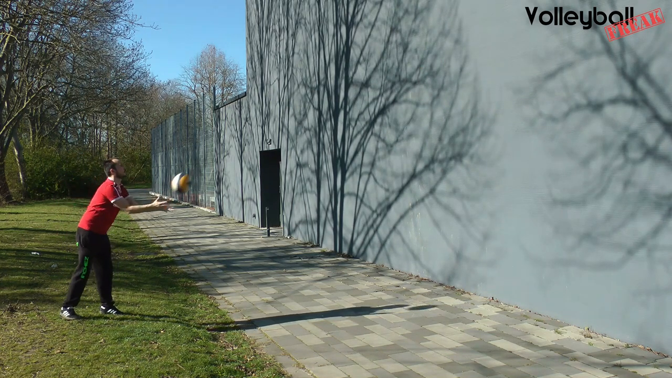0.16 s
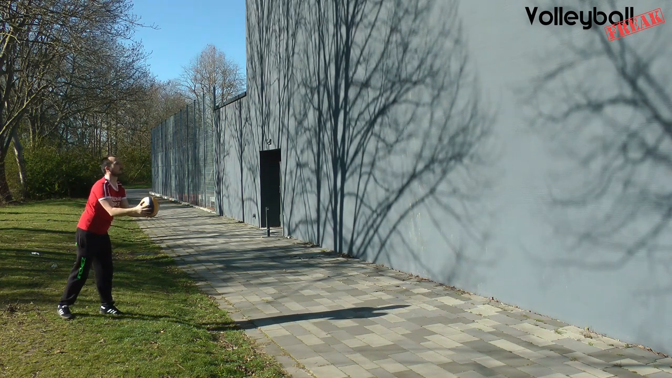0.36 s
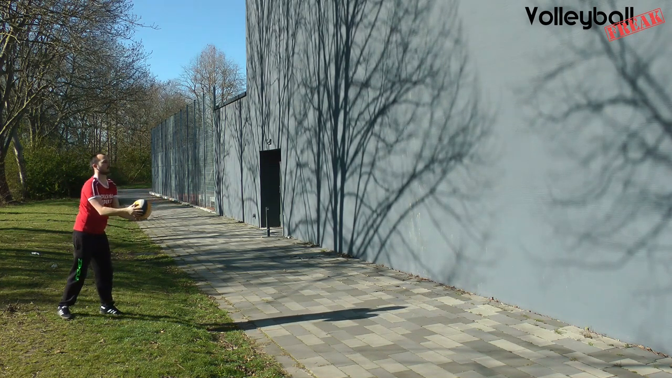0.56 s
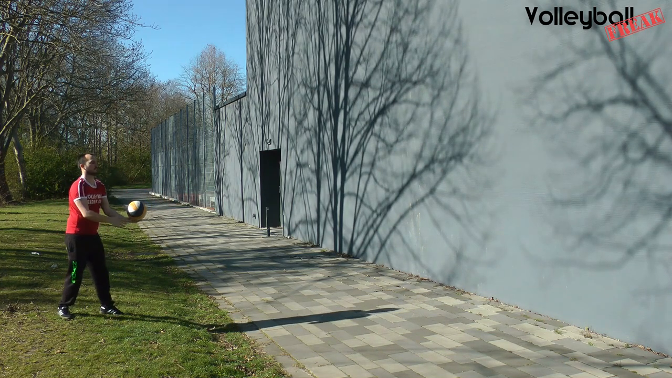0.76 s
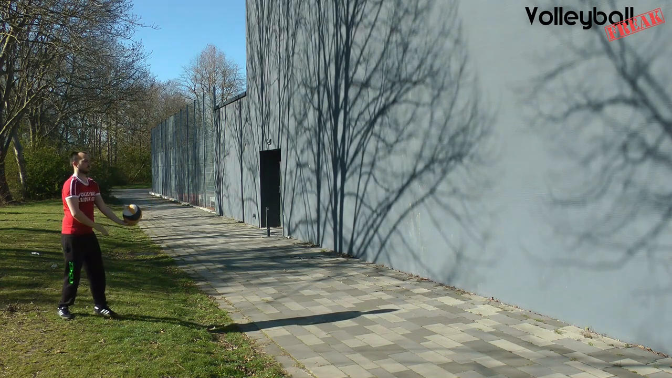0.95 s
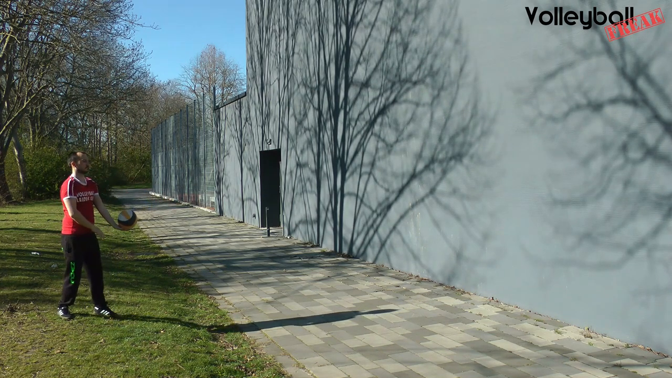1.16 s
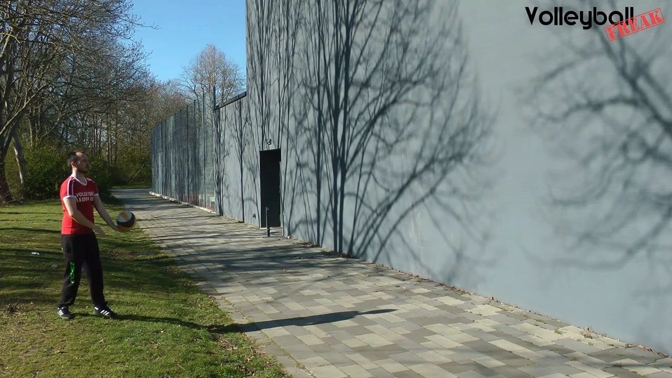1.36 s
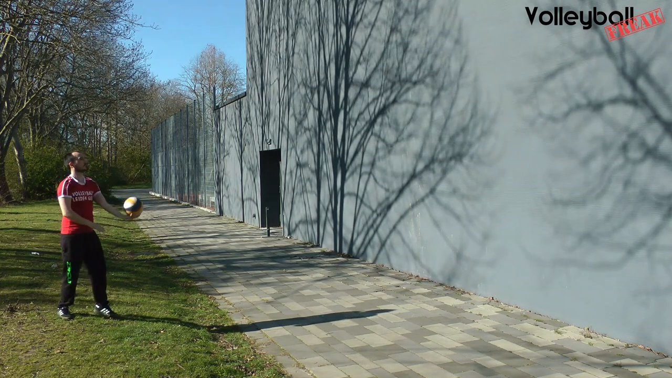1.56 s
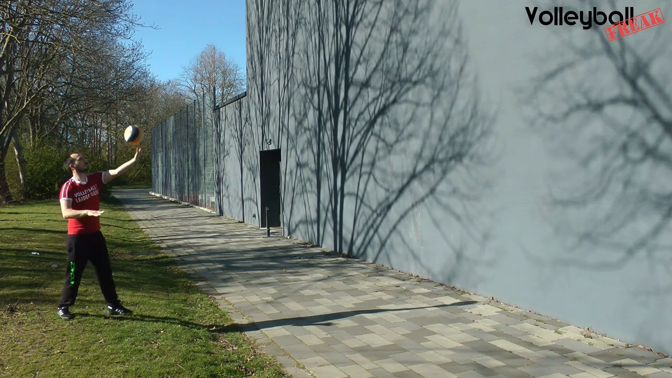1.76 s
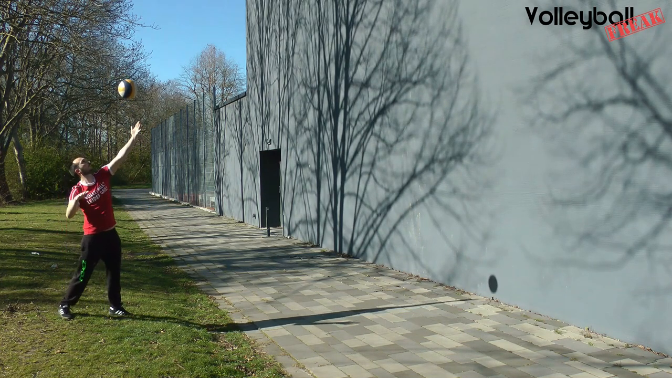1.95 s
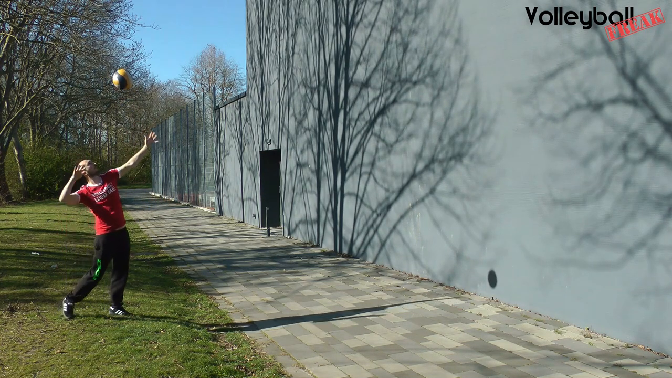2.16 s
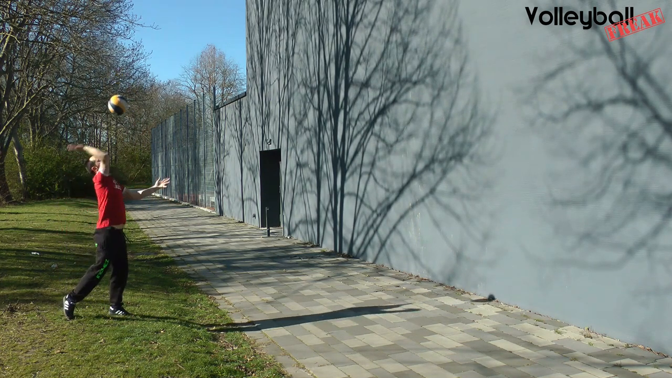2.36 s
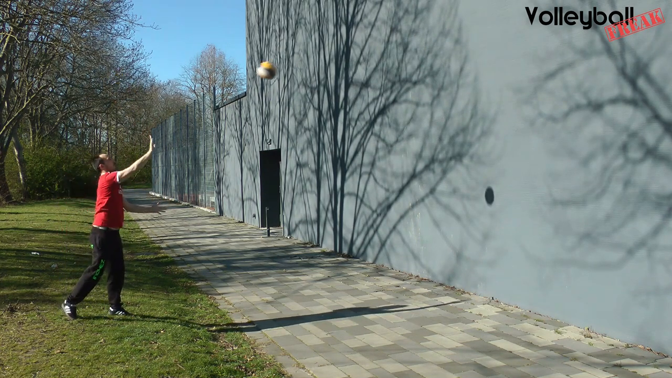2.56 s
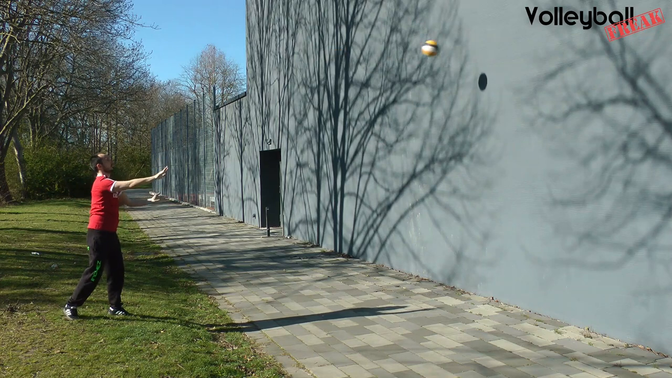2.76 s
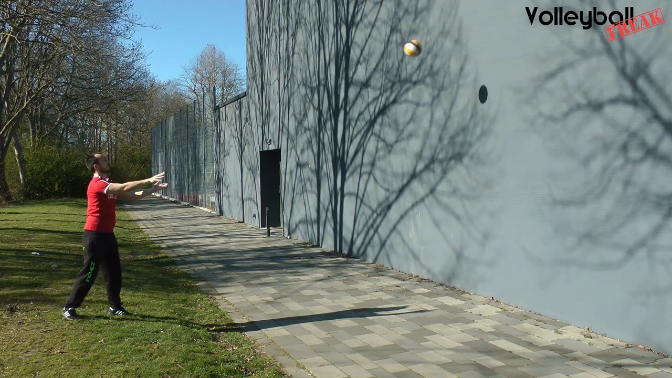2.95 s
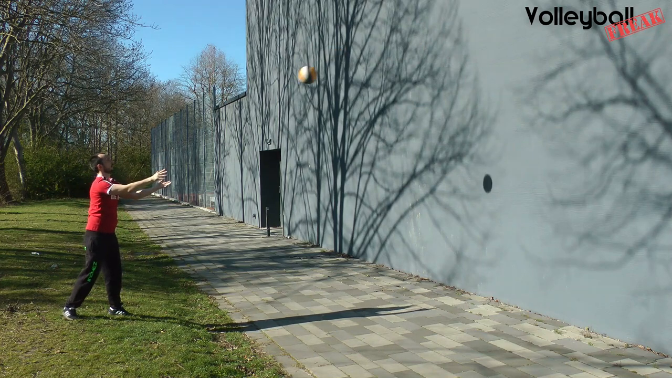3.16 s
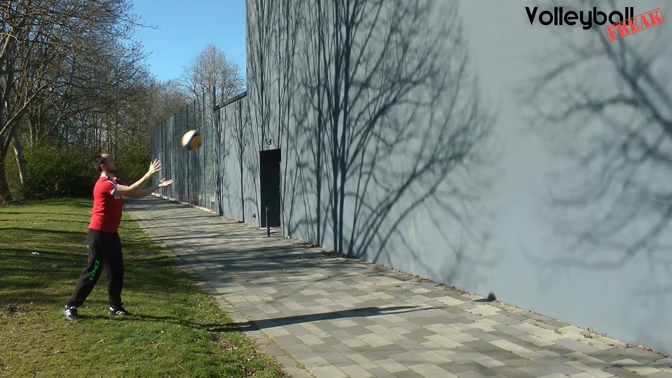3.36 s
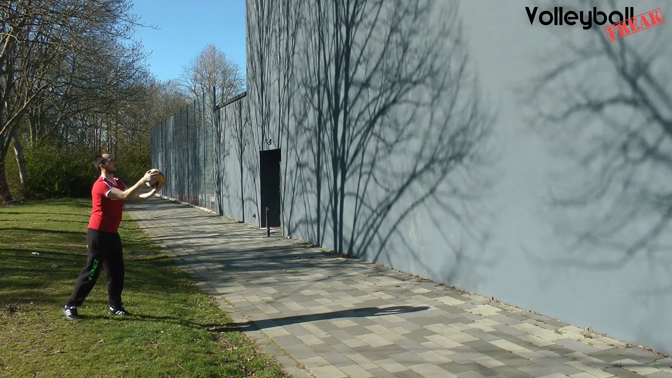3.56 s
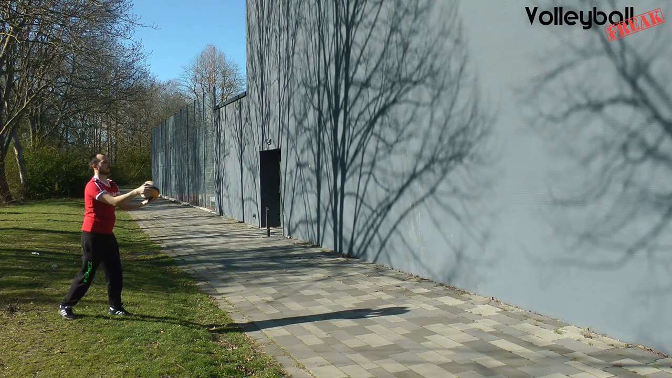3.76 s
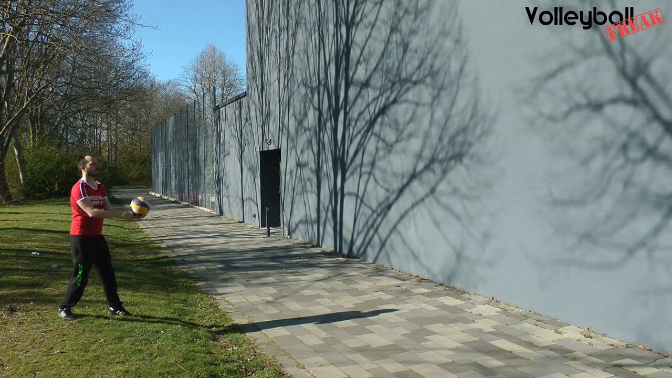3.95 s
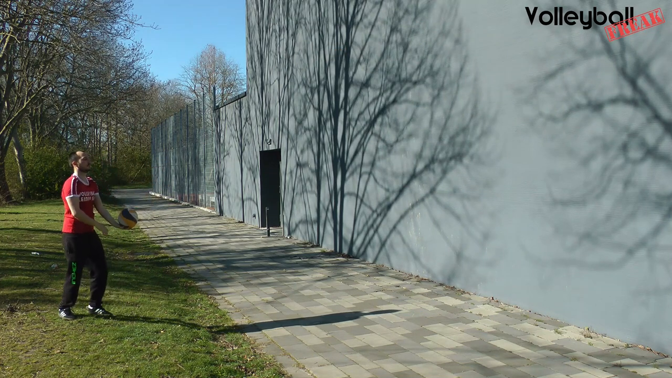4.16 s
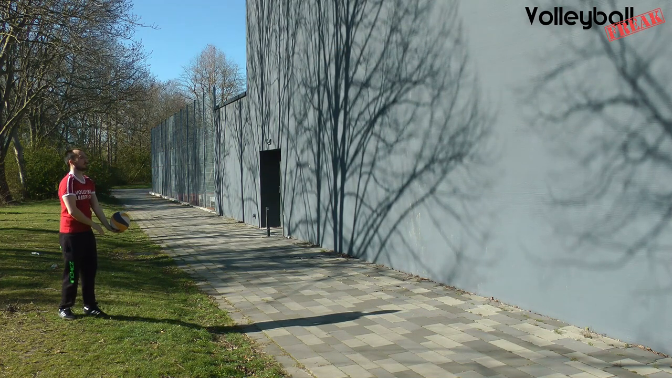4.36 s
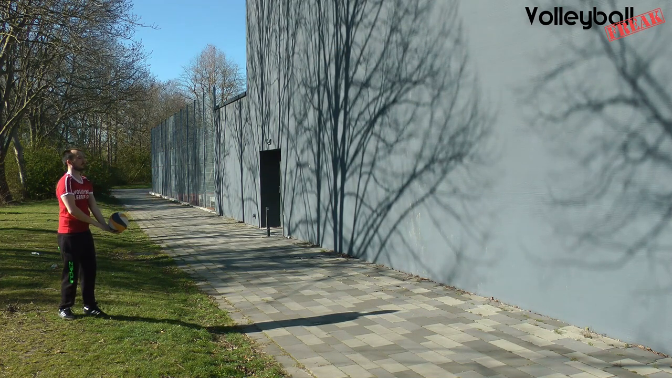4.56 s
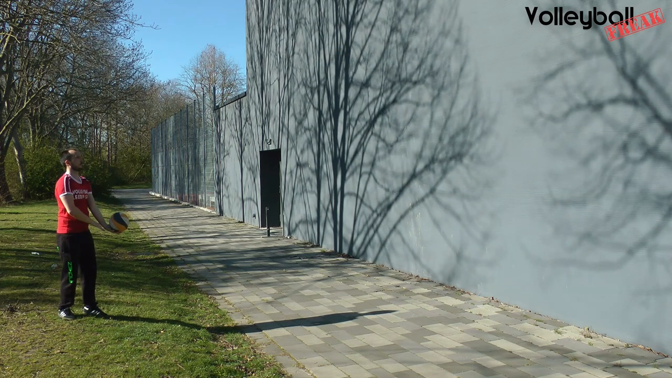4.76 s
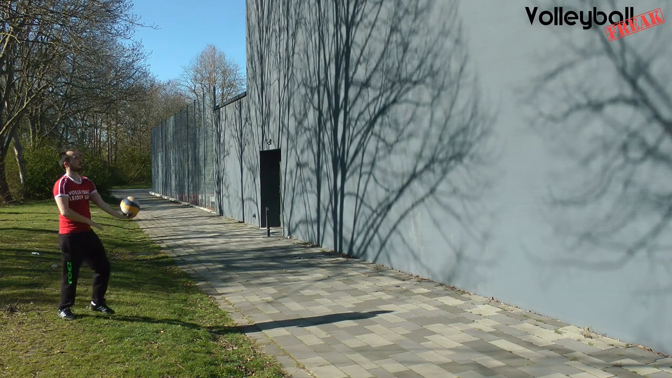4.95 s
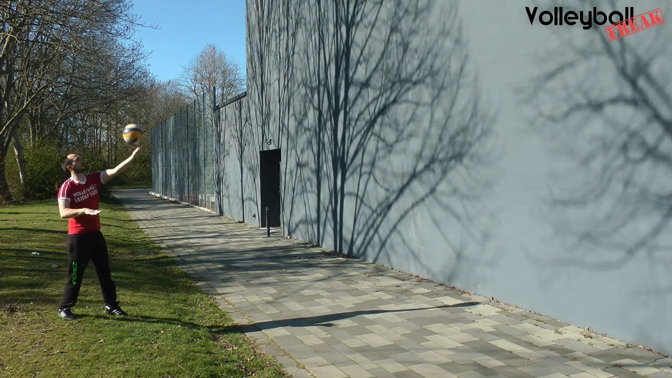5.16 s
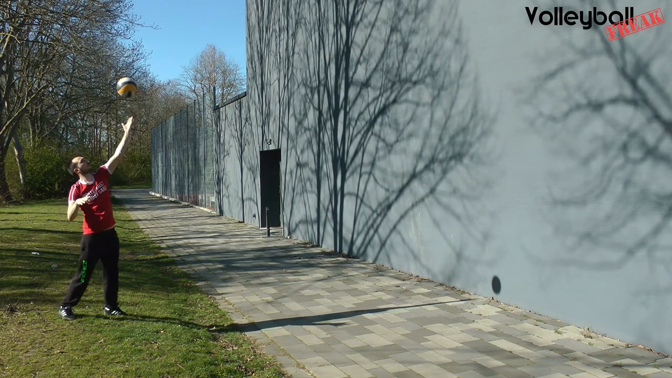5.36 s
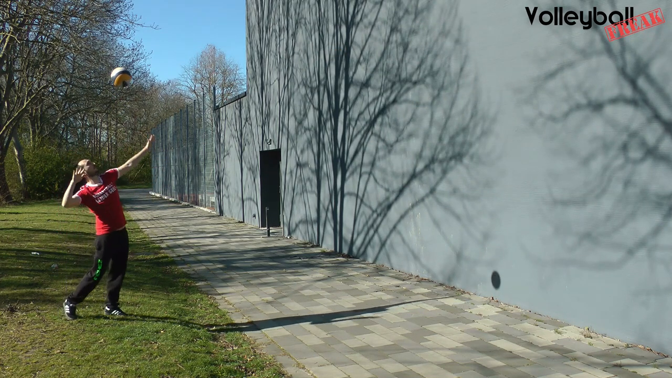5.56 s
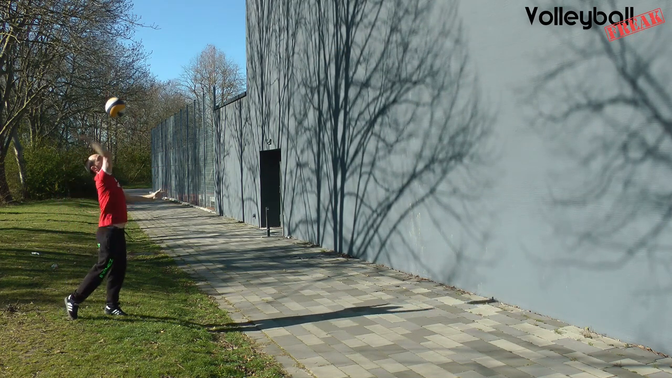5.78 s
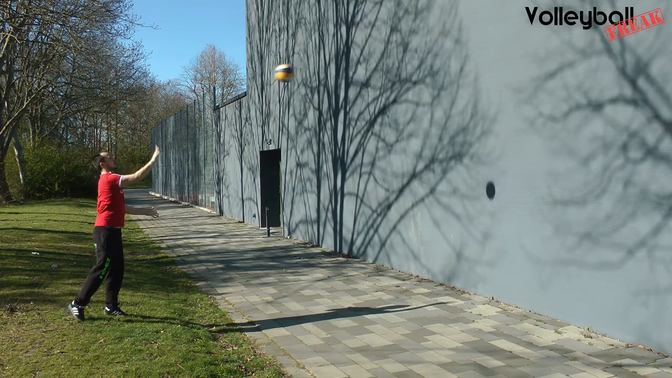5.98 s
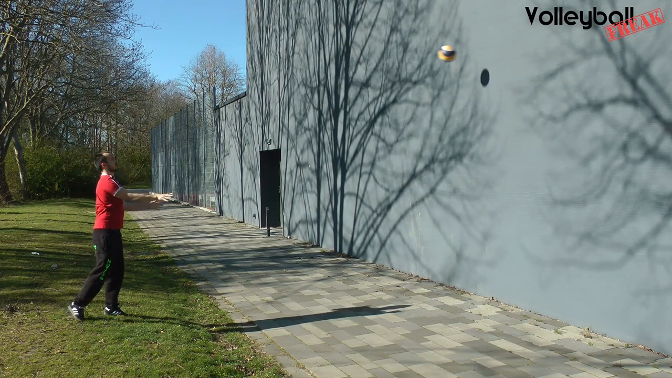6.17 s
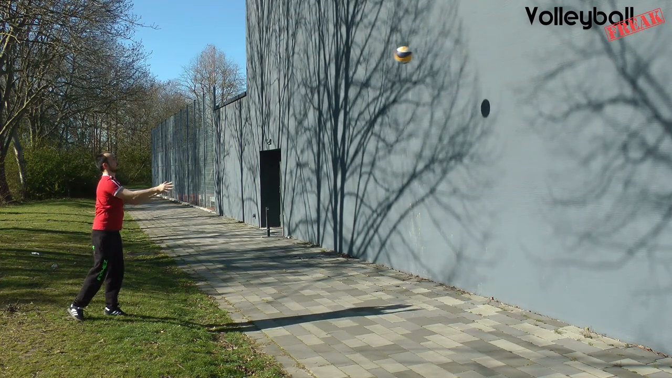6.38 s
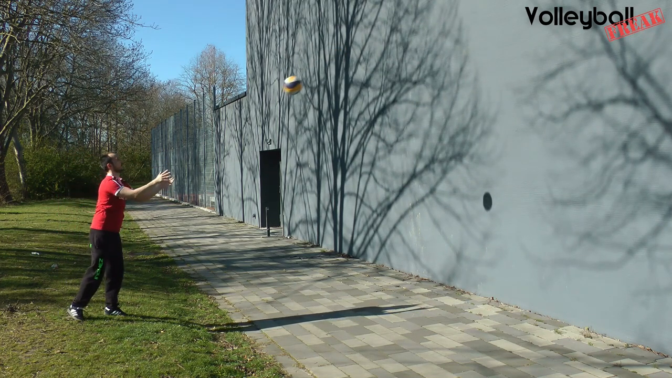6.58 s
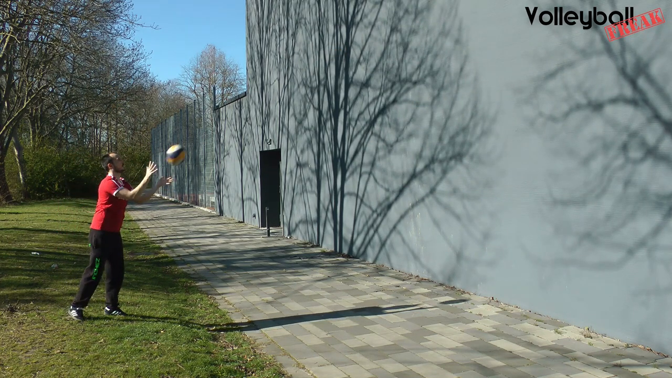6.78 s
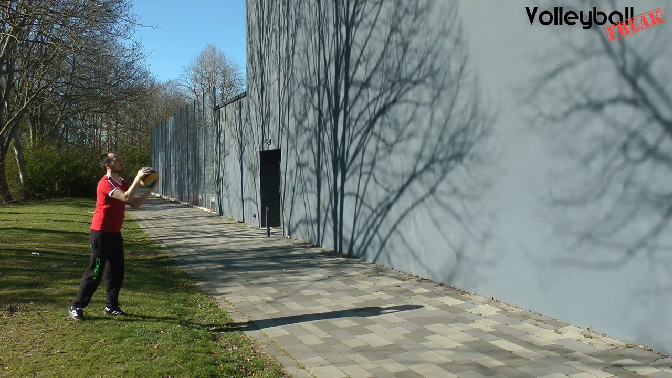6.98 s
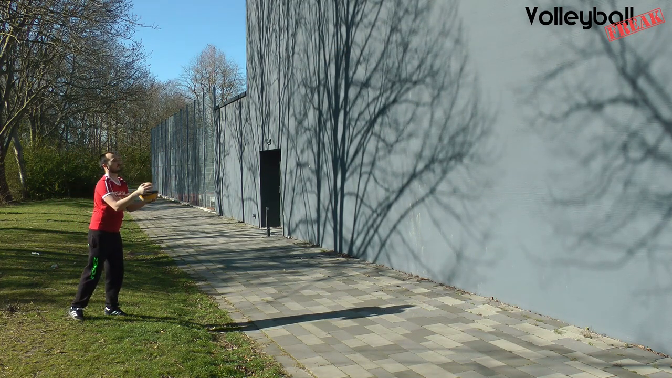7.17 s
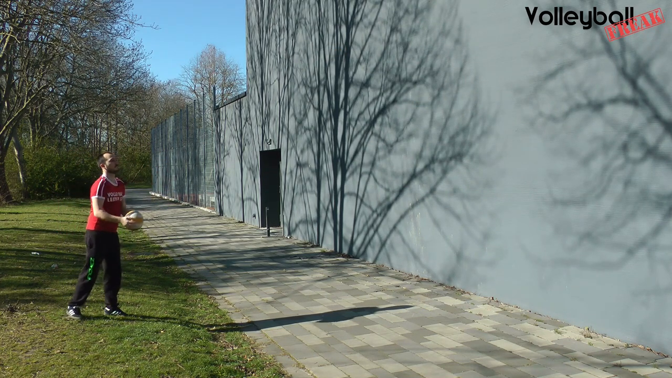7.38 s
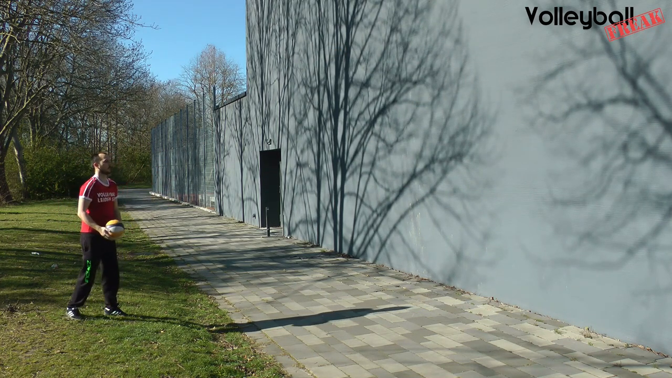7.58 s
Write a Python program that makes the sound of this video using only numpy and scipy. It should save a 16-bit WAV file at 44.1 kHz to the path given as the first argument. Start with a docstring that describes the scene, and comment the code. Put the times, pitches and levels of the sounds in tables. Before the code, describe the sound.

Outdoors, a volleyball is caught, then twice served with a sharp hand smack, bounced off a concrete wall and caught with a slap.

```python
"""In a park, close to the player, a volleyball is served at a high concrete wall and caught on the rebound.
One catch opens the scene, then serve, wall hit and catch follow twice.
Each blow layers a slap (short sine), a crack and a cover shiver (fading noise), a low thump and an air ping.
Filtered echoes and grainy noise send the blows back from paving, wall and trees. Between them come dull
steps and bumps, a soft closing of the hand, snaps and shirt rustle, over outdoor air and a faint whine."""
import sys
import numpy as np
from scipy import signal
from scipy.fft import rfft, irfft, next_fast_len
from scipy.io import wavfile

SR = 44100
rng = np.random.default_rng(int(sys.argv[2]) if len(sys.argv) > 2 else 0)


def master_out(mix):
    """Clip the mix to full scale and print it as 16-bit PCM to the path in sys.argv[1]."""
    frames = np.transpose(np.atleast_2d(mix))
    ceiling = np.clip(frames, -1, 1)
    pcm = np.round(ceiling * 32767).astype(np.int16)
    wavfile.write(sys.argv[1], SR, pcm)


N = 336042                         # length of the scene [samples]
TIME = np.arange(N) / SR           # [s]
BLOW_SIZE = 32768                  # length of one blow or bump [samples]
AGE = np.arange(BLOW_SIZE) / SR    # time since the touch [s]

# tint of the outdoor air: (frequency [Hz], relative level [dB])
AIR_COLOUR = [(15, -42.5), (25, -5), (48, 1.5), (108, 0), (137, -7.5), (206, -11), (263, -15), (301, -18),
              (344, -20.5), (427, -20), (988, -24), (1100, -25), (1840, -31.5), (13200, -38),
              (16000, -42.5)]
# slow course of the distant wash: (time [s], relative level [dB])
WASH = [(0.0, -65), (1.4, -67.5), (1.78, -65), (3.52, -63), (3.88, -65), (5.26, -62.5), (7.62, -65.5)]
# the player shifts his weight, tosses or gathers the ball: (centre time [s], length [s], effort [dB])
MOVES = [(0.3, 1.8, -1), (2.0, 0.87, -2), (4.1, 0.64, -1), (5.45, 1.1, -1), (6.4, 0.73, -2.5),
         (7.38, 0.44, 2.5)]
# swells of a far-off whine: (centre time [s], length [s], level [dB])
WHINE_SWELLS = [(4.449, .4, -67), (4.857, 0.25, -61), (5.32, 0.31, -60.5)]
WHINE_HZ, WHINE_RISE_HZ_PER_S = 1115, 120   # pitch at the first swell, and its climb

# shirt strokes on the microphone as the arms move: (peak time [s], peak level [dB], rise [s], t60 [s])
BRUSHES = [(1.73, -59.5, 0.037, 0.66), (4.91, -59, .04, .2), (5.05, -58, 0.034, 0.16),
           (5.737, -40.5, 0.0023, 0.19)]
# tint of the brushing shirt: (frequency [Hz], relative level [dB])
BRUSH_COLOUR = [(180, -25), (300, 1.5), (603, -13), (978, -11), (1140, -13), (9240, -24.5), (16000, -31)]
# tint of the swishing sleeve: (frequency [Hz], relative level [dB])
SWING_COLOUR = [(200, -8), (400, 1.5), (750, 1.5), (1300, -9), (1700, -13), (2100, -11), (2700, -24),
                (3400, -17), (4500, -28), (7000, -29), (12000, -34)]
# the sleeve swishes as the arm swings up to the ball; the hold counts from the start
SWING_START_S, SWING_ATTACK_S, SWING_HOLD_S, SWING_T60_S, SWING_DB = 2.375, 0.043, 0.096, 0.09, -47
# steps, body bumps and, at 6.943 s, fingers closing softly on the caught ball:
# (time [s], relative level [dB], frequency [Hz], t60 [s])
BUMPS = [(0.415, -37, 123, 0.19), (0.785, -42.5, 112.4, .25), (1.889, -33.5, 101, 0.09),
         (2.348, -29.5, 140, 0.053), (3.941, -30.5, 124, 0.1), (4.028, -42, 110, 0.29),
         (5.176, -36.5, 160, 0.031), (5.707, -24, 200, 0.075), (5.730, -19, 104, 0.08),
         (6.943, -23, 220, .03), (7.298, -37, 149, 0.28), (7.38, -26.5, 139, .056),
         (7.435, -33, 137, 0.077)]
# small snaps of cloth and grit: (time [s], peak level [dB], frequency [Hz], t60 [s])
TICKS = [(0.123, -46, 696, .028), (0.575, -48, 910, 0.01), (1.871, -48.5, 2780, .0075),
         (2.222, -35.5, 350, 0.017), (5.628, -37, 536, 0.011), (5.696, -34, 1500, 0.015),
         (5.696, -39, 4500, 0.011), (5.733, -27, 644, 0.0086), (5.770, -35, 9000, 0.0089),
         (5.864, -47, 900, .014)]

# air modes inside the ball, a sphere: (frequency [Hz], relative level [dB], t60 [s])
BALL_AIR = [(1087, 6, 0.16), (1274, 0.5, .1), (1880, -1.5, .12), (2340, -10.5, .12), (3030, -8.5, .16),
            (3150, -4.5, .52), (3872, -8, 0.35), (4190, -6, 0.24), (4557, -7, 0.33), (5000, -26, 0.34)]
# tint of the crack as skin or wall meets the cover: (frequency [Hz], relative level [dB])
CRACK_COLOUR = [(200, -12.5), (700, -2.5), (1400, 8.5), (2100, 2.5), (3300, 7), (5500, -5.5), (7500, -6.5),
                (11000, -4.5), (16000, -12.5)]
# tint of the shivering cover: (frequency [Hz], relative level [dB])
SHELL_COLOUR = [(80, 3.5), (200, 14.5), (400, 7), (800, 3.5), (1400, 0.5), (2100, -7.5), (3500, -19.5),
                (6000, -23.5), (10000, -26.5), (16000, -26.5)]

# hits on the wall: (time [s], strength [dB], relative air ring [dB],
#                    slap on landing [Hz], slap on springing off [Hz])
WALL_HITS = [(2.9120, 0, -1, 840, 750), (6.3119, -.5, 4, 735, 710)]
# landing and springing off, relative to each hit: (time after the touch [s], thump [dB], thump [Hz],
#   thump length [s], slap [dB], slap length [cycles], crack [dB], shell [dB], air ring [dB],
#   air ring tilt [dB per octave])
WALL_CONTACTS = [(0, -10, 133.7, .011, 1, 1.9, -23, -19, -62, -5),
                 (.0053, -20.5, 132.5, .017, -2.5, 1.9, -17, -27, -68, -5)]
# catches, palm first: (time [s], palm thump [dB], palm thump [Hz], palm slap [dB], palm slap [Hz],
#   delay of the fingers [s], finger slap [dB], finger slap [Hz], finger crack [dB], finger shell [dB],
#   finger air ring [dB], air ring tilt [dB per octave])
CATCHES = [(0.2704, -16, 80, -8, 620, .0022, -9.5, 1420, -18, -16.5, -54, -6),
           (0.2925, -28, 149, -19, 1200, 0.00098, -13, 1370, -26.5, -30.5, -67, -3),
           (3.4936, -9, 96, -0.5, 590, 0.0017, -3, 1254, -17, -25.5, -51.5, 7),
           (3.5199, -17.5, 125, -1.5, 1000, .0022, 2.5, 3670, -20, -21, -54, 2),
           (3.546, -30, 150.3, -25, 600, .003, -23, 1150, -39.5, -35, -66, 0.5),
           (6.8974, -10, 74, 4, 420, .0023, -9.5, 3850, -14.5, -23.5, -46, -3.5),
           (6.9105, -10, 64, -16, 610, 0.0021, -13.5, 575, -47, -29.5, -79, 0)]
CATCH_THUMP_SWINGS, PALM_CYCLES, FINGER_CYCLES = 1.0, 2.3, 10   # thump length [swings], slap t60 [cycles]
# the fingers flex the ball less than the palm does, and faster
FINGER_THUMP_DB, FINGER_THUMP_HZ, FINGER_THUMP_S = -11, 231, 0.008
# the palm cracks and rings the ball less than the fingers do
PALM_CRACK_DB, PALM_SHELL_DB, PALM_AIR_DB = -5.5, -3.5, -12
# the second finger lands just after the first, weaker and higher
SECOND_FINGER_S, SECOND_FINGER_DB, SECOND_FINGER_PITCH = 0.0002, -5, 1.4
# serves: (time [s], strength [dB], relative air ring [dB],
#          slap of the palm [Hz], of the finger snap [Hz], of the release [Hz])
SERVES = [(2.4848, 0, -6, 1200, 3300, 1120), (5.8895, 0, -2, 1500, 2700, 1060)]
# palm, snap of the fingers and release, relative to each serve: columns as in WALL_CONTACTS
SERVE_CONTACTS = [(0, -3.5, 117, 0.014, -1.5, 6.2, -15, -14.5, -53.5, -3),
                  (.0006, -32, 261, 0.0071, -8.5, 12, -26.5, -33, -65, -5),
                  (0.0122, -21, 197, .0043, -8.5, 6.5, -46, -27, -72, -9)]

# distinct reflections off paving and walls: (delay [s], level [dB], low-pass cut-off [Hz])
WALL_ECHOES = [(0.0268, -24.5, 149), (.0450, -15.5, 109.7), (.064, -38.5, 4000)]
CATCH_ECHOES = [(.0075, -21.5, 2700), (.032, -22, 1500)]
SERVE_ECHOES = [(0.026, -26, 7000), (0.0701, -40.5, 7000)]
# tint of the return from the trees, for blows at the wall: (frequency [Hz], relative level [dB])
SCATTER_WALL = [(40, -16), (75, -1), (150, -23), (400, -26.5), (1200, -20.5), (2200, -11.5), (3400, -13),
                (5000, -12.5), (8000, -16.5), (16000, -29)]
# tint of the return from the trees, for blows at the player: (frequency [Hz], relative level [dB])
SCATTER_NEAR = [(50, -31), (130, -30), (400, -28), (1200, -29), (3300, -27.5), (6000, -21), (9000, -32.5),
                (16000, -48)]

# tint of the copy that sets the two channels apart: (frequency [Hz], level [dB])
WIDTH_COLOUR = [(100, -39), (1200, -51.5), (3000, -40), (12000, -32.5)]
# tint of the self-noise in each channel: (frequency [Hz], relative level [dB])
HISS_COLOUR = [(18, -28), (30, 0), (132, -8), (211, -11.5), (260, -10.5), (364, -14.5), (1600, -21.5),
               (15000, -27.5)]


def amp(db):
    """Decibels to gain."""
    return 10 ** (np.asarray(db) / 20)


def rms_one(x):
    """Scale to rms 1."""
    return x / np.sqrt(np.mean(x ** 2) + 1e-20)


def add(track, s, sound):
    """Mix a sound into a track from time s on."""
    at = int(round(s * SR))
    track[at:at + len(sound)] += sound[:len(track) - at]


def butter(x, hz, kind, order=2):
    """Causal Butterworth filter."""
    sections = signal.butter(order, hz, kind, fs=SR, output="sos")
    return signal.sosfilt(sections, x + 1e-18)   # the tiny offset keeps silence cheap to filter


def colour(x, points):
    """Causal minimum-phase filter through (frequency, level) points, so attacks stay sharp."""
    size = 2 * next_fast_len(len(x) // 2 + 1)
    hz, db = np.transpose(points)
    bins = np.maximum(np.arange(size // 2 + 1) * SR / size, 1)
    gain = amp(np.interp(np.log(bins), np.log(hz), db))
    # folding the cepstrum onto positive time gives the minimum phase
    cepstrum = irfft(np.log(gain))
    cepstrum[1:size // 2] *= 2
    cepstrum[size // 2 + 1:] = 0
    response = np.exp(rfft(cepstrum))
    return irfft(rfft(x, size) * response)[:len(x)]


def noise(points, size):
    """Coloured noise of rms 1."""
    return rms_one(colour(rng.standard_normal(size), points))


def drift(per_s):
    """Random wander through per_s points a second, drawn with spread 1."""
    knots = rng.standard_normal(4096)
    return np.interp(TIME * per_s, np.arange(len(knots)), knots)


def fade(t60):
    """Free decay by 60 dB in t60 seconds."""
    return np.exp(-np.log(1000) * AGE / t60)


def ring(hz, t60):
    """A struck mode: a sine that dies away freely."""
    return np.sin(2 * np.pi * hz * AGE) * fade(t60)


def swell(s, length):
    """A bell-shaped rise and fall around time s."""
    return np.exp(-(2 * (TIME - s) / length) ** 2)


def outdoors(rumble_db=-57, gust_db=1.5, wash_db=3.5, rustle_db=-76,
             moving_low_db=-56, moving_mid_db=-67, moving_top_db=-69.5):
    """Lumpy low air, a distant wash and a light rustle on top; all three rise when the player moves."""
    effort = sum(amp(db) * swell(s, length) for s, length, db in MOVES)
    wash_times, wash_levels = np.transpose(WASH)
    wash = amp(np.interp(TIME, wash_times, wash_levels) + wash_db)
    # still air and movement are unrelated noises, so their powers add
    low_level = np.hypot(amp(rumble_db), amp(moving_low_db) * effort) * amp(gust_db * drift(12))
    middle_level = np.hypot(wash, amp(moving_mid_db) * effort)
    top_level = np.hypot(amp(rustle_db), amp(moving_top_db) * effort)
    low = rms_one(butter(noise(AIR_COLOUR, N), 250, "low"))
    middle = rms_one(butter(noise(AIR_COLOUR, N), [250, 3200], "band"))
    top = rms_one(butter(noise(AIR_COLOUR, N), 3545, "high"))
    return low_level * low + middle_level * middle + top_level * top


def whine():
    """A narrow band of noise, far off, that creeps up in pitch and swells three times."""
    hz = WHINE_HZ + WHINE_RISE_HZ_PER_S * (TIME - WHINE_SWELLS[0][0])
    phase = 2 * np.pi * np.cumsum(hz) / SR
    level = sum(amp(db) * swell(s, length) for s, length, db in WHINE_SWELLS)
    # random drift on sine and cosine smears the tone into a band
    band = drift(190) * np.sin(phase) + drift(210) * np.cos(phase)
    return level * rms_one(band)


def shirt():
    """Cloth rubs the microphone in short noise strokes, and the sleeve swishes before the first serve."""
    strokes = np.zeros(N)
    for s, db, rise, t60 in BRUSHES:
        before = np.minimum(TIME - s, 0)
        after = np.maximum(TIME - s, 0)
        strokes += amp(db) * np.exp(-(before / rise) ** 2 - np.log(1000) * after / t60)
    age = TIME - SWING_START_S
    attack = np.clip(age / SWING_ATTACK_S, 0, 1)
    release = np.exp(-np.log(1000) * np.maximum(age - SWING_HOLD_S, 0) / SWING_T60_S)
    brushing = strokes * noise(BRUSH_COLOUR, N)
    return brushing + amp(SWING_DB) * attack * release * noise(SWING_COLOUR, N)


def player():
    """Dull steps, bumps and a soft closing of the hand (low mode plus noisy scuff), and small noise snaps."""
    out = np.zeros(N)
    for s, db, hz, t60 in BUMPS:
        band = [hz / 2, hz * 1.21]
        scuff = rms_one(butter(rng.standard_normal(BLOW_SIZE), band, "band")) * fade(t60)
        thud = 0.73 * ring(hz, t60) + 0.46 * scuff
        add(out, s, amp(db) * butter(thud, 3.2 * hz, "low", order=3))
    for s, db, hz, t60 in TICKS:
        burst = rng.standard_normal(BLOW_SIZE) * fade(t60)
        snap = butter(burst, [hz / 2, hz * 1.21], "band")
        add(out, s, amp(db) * snap / np.abs(snap).max())
    return out


def park(x, echoes, scatter, build_s, t60, wet_db, grain_db=4):
    """Single reflections off paving and wall, then a grainy return from trunks and branches."""
    out = x.copy()
    for delay, db, cut_hz in echoes:
        add(out, delay, amp(db) * butter(x, cut_hz, "low", order=1))
    trees = rng.standard_normal(BLOW_SIZE) * amp(grain_db * drift(700)[:BLOW_SIZE])
    trees *= (1 - np.exp(-AGE / build_s)) ** 2 * fade(t60)
    trees /= np.sqrt(np.sum(trees ** 2))   # unit energy before the tint
    trees = colour(trees, scatter)
    return out + amp(wet_db) * signal.fftconvolve(x, trees)[:N]


def blow(row, crack_t60, shell_t60, flex_s, flex_lead, squeeze_s=0.00015, split_hz=5):
    """One contact: the cover slaps and cracks, the ball flexes, the cover shivers, the air inside rings."""
    (thump_db, thump_hz, thump_s, slap_db, slap_hz, cycles,
     crack_db, shell_db, air_db, air_tilt_db) = row
    squeeze = 1 - np.exp(-AGE / squeeze_s)   # softens the very first instant
    # the cover is stopped dead: a short pressure swing
    out = -amp(slap_db) * ring(slap_hz, cycles / slap_hz)
    # air squirts from between the two surfaces
    out += amp(crack_db) * noise(CRACK_COLOUR, BLOW_SIZE) * fade(crack_t60) * squeeze
    # flex_s later the whole ball flexes; a driving hand starts it part-way through a swing (flex_lead [rad])
    swings = np.sin(2 * np.pi * thump_hz * AGE + flex_lead) * np.exp(-(AGE / thump_s) ** 2)
    add(out, flex_s, amp(thump_db) * swings * squeeze)
    # the cover shivers in many damped modes
    out += amp(shell_db) * noise(SHELL_COLOUR, BLOW_SIZE) * fade(shell_t60) * squeeze
    # the ball is not quite round, so each air mode is a slowly beating pair
    for hz, db, t60 in BALL_AIR:
        pair = ring(hz, t60) + 0.25 * ring(hz + split_hz * rng.uniform(1, 2), t60)
        tilt_db = air_tilt_db * np.log2(hz / 3000)
        out += amp(air_db + db + tilt_db) * pair
    return out


def strikes(rows, crack_t60, shell_t60, flex_s, flex_lead):
    """All contacts of one kind on a track."""
    out = np.zeros(N)
    for s, *row in rows:
        add(out, s, blow(row, crack_t60, shell_t60, flex_s, flex_lead))
    return out


def repeated(hits, contacts):
    """Each hit plays the same run of contacts with its own strength, air ring and slap pitches."""
    rows = []
    for s, db, ring_db, *pitches in hits:
        for slap_hz, contact in zip(pitches, contacts):
            after, thump, thump_hz, thump_s, slap, cycles, crack, shell, air, tilt = contact
            rows.append((s + after, thump + db, thump_hz, thump_s, slap + db, slap_hz, cycles,
                         crack + db, shell + db, air + ring_db, tilt))
    return rows


def palm_and_fingers(hands):
    """Each hand makes three contacts: the palm, then two fingers that crack and ring the ball more."""
    finger_pair = ((0, 0, 1), (SECOND_FINGER_S, SECOND_FINGER_DB, SECOND_FINGER_PITCH))
    rows = []
    for hand in hands:
        (s, thump, thump_hz, palm, palm_hz, later, fingers, fingers_hz,
         crack, shell, air, tilt) = hand
        rows.append((s, thump, thump_hz, CATCH_THUMP_SWINGS / thump_hz, palm, palm_hz, PALM_CYCLES,
                     crack + PALM_CRACK_DB, shell + PALM_SHELL_DB, air + PALM_AIR_DB, tilt))
        for after, db, pitch in finger_pair:
            rows.append((s + later + after, thump + FINGER_THUMP_DB + db, FINGER_THUMP_HZ, FINGER_THUMP_S,
                         fingers + db, fingers_hz * pitch, FINGER_CYCLES,
                         crack + db, shell + db, air + db, tilt))
    return rows


def wall_hits(wobble_db=-23, wobble_hz=55, wobble_t60=0.63, ping_db=-48, ping_hz=3230, ping_t60=0.65,
              approach_s=0.13, distance_hz=6000):
    """The ball smacks the concrete and springs off; its wobble dies while its ping comes nearer."""
    contacts = strikes(repeated(WALL_HITS, WALL_CONTACTS),
                       crack_t60=0.0087, shell_t60=0.054, flex_s=0.0003, flex_lead=0.14)
    dry = butter(contacts, distance_hz, "low")   # distance dulls the treble
    pings = np.zeros(N)
    nearer = 1 - np.exp(-AGE / approach_s)
    for s, *_ in WALL_HITS:
        add(dry, s, amp(wobble_db) * ring(wobble_hz, wobble_t60))
        add(pings, s, amp(ping_db) * ring(ping_hz, ping_t60) * nearer)
    return park(dry, WALL_ECHOES, SCATTER_WALL, build_s=0.034, t60=0.47, wet_db=-3.0) + pings


def catches():
    """Palms and fingers land on the ball one after another, each with its own slap and thump."""
    dry = strikes(palm_and_fingers(CATCHES), crack_t60=0.012, shell_t60=0.09, flex_s=0.00083, flex_lead=0.2)
    return park(dry, CATCH_ECHOES, SCATTER_NEAR, build_s=0.007, t60=0.34, wet_db=-3.0)


def serves():
    """The open hand hits the ball, close by, and the ball snaps off the palm."""
    dry = strikes(repeated(SERVES, SERVE_CONTACTS),
                  crack_t60=0.0097, shell_t60=0.06, flex_s=0.0009, flex_lead=0.99)
    return park(dry, SERVE_ECHOES, SCATTER_NEAR, build_s=0.0057, t60=0.39, wet_db=4.0)


def scene(width_s=0.0016):
    """Almost mono: a faint, slightly late copy is added to one channel and taken from the other."""
    mono = outdoors() + whine() + shirt() + player() + wall_hits() + catches() + serves()
    side = np.zeros(N)
    add(side, width_s, colour(mono, WIDTH_COLOUR))
    return np.array([mono + side, mono - side])


def record(dry, ceiling=1.36, hiss_left_db=-62, hiss_right_db=-65, cutoff_hz=16300):
    """Bass roll-off, rounded peaks, a trace of hiss in each channel and a steep top cut."""
    hiss = np.array([amp(db) * noise(HISS_COLOUR, N) for db in (hiss_left_db, hiss_right_db)])
    rolled_off = butter(dry, 28, "high")
    rounded = ceiling * np.tanh(rolled_off / ceiling)
    top_cut = signal.ellip(10, 0.1, 80, cutoff_hz, fs=SR, output="sos")
    return signal.sosfilt(top_cut, rounded + hiss)


dry = scene()
out = record(dry)
master_out(out)
```